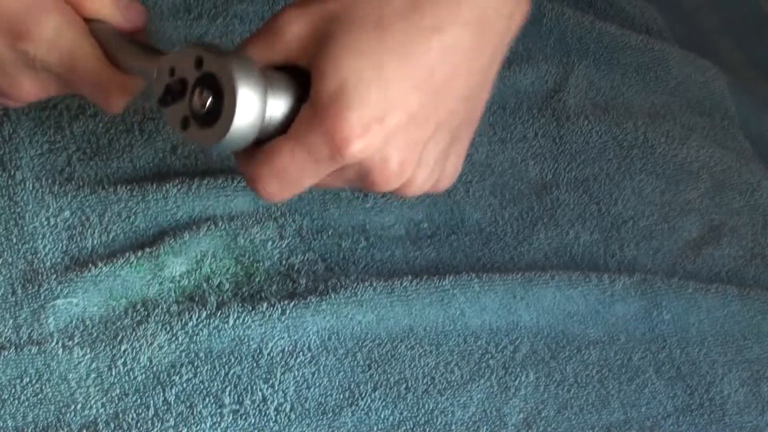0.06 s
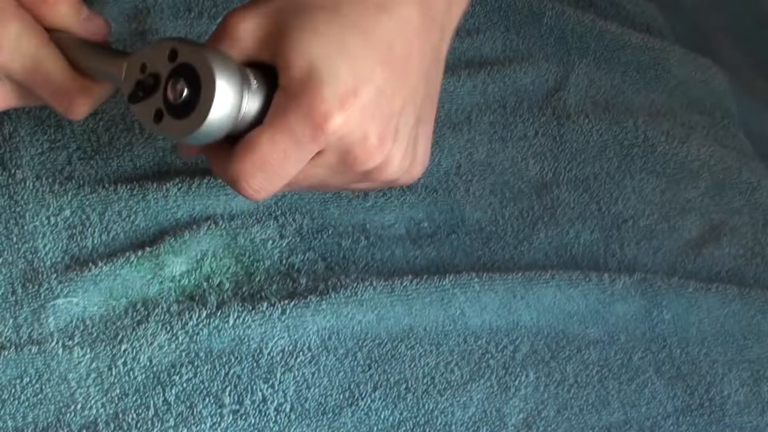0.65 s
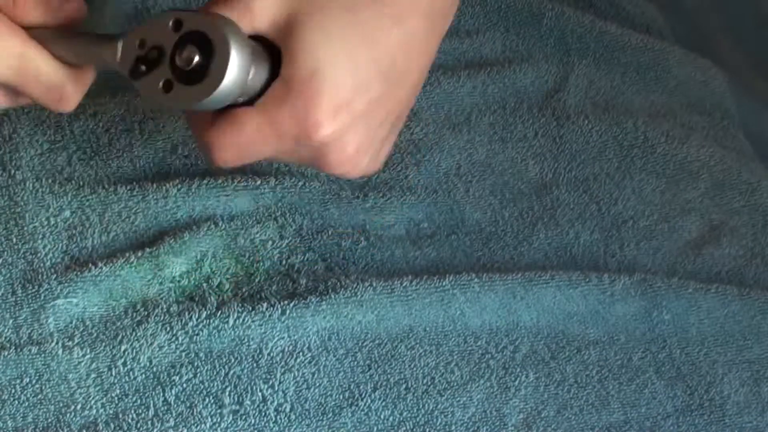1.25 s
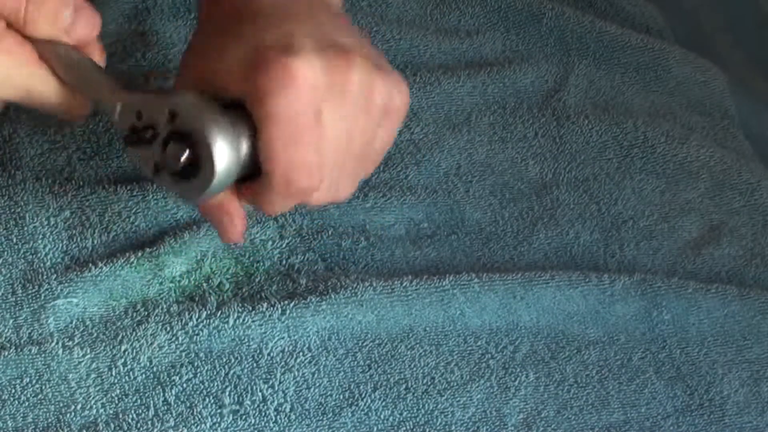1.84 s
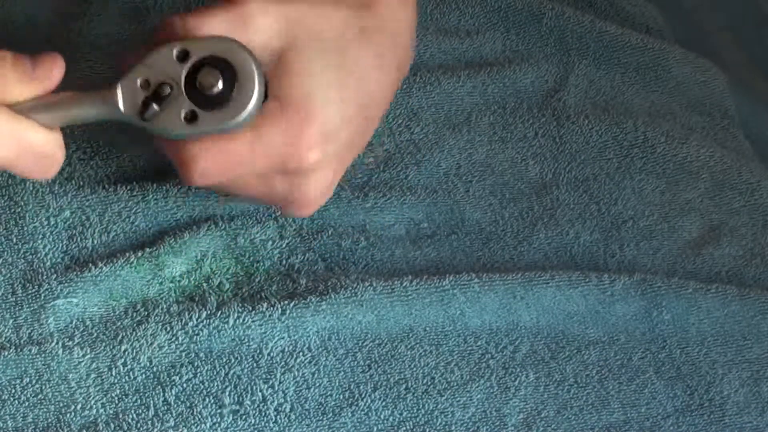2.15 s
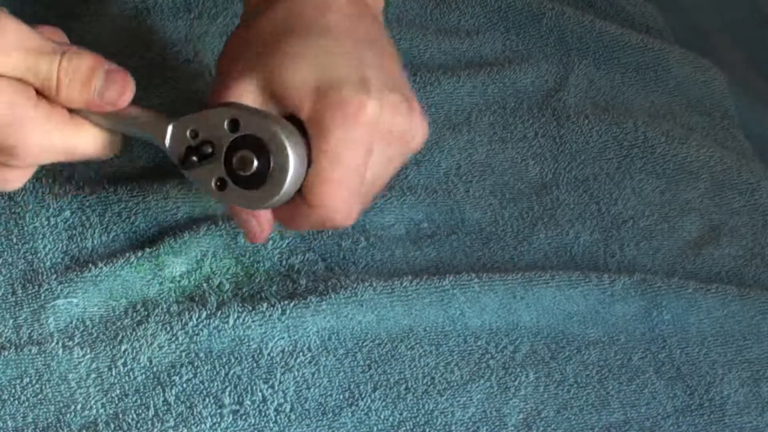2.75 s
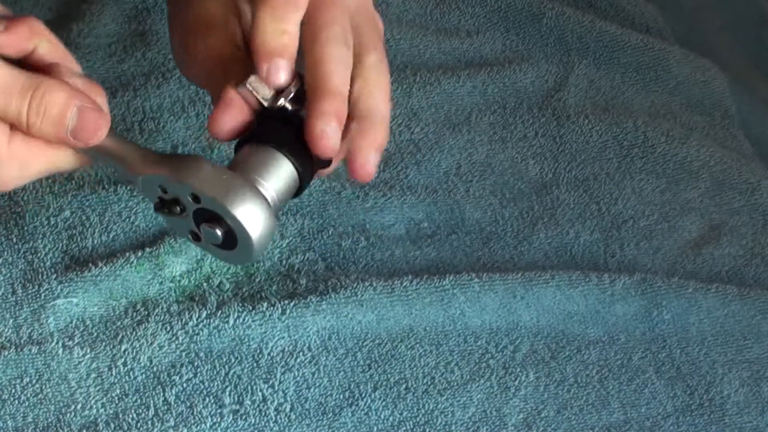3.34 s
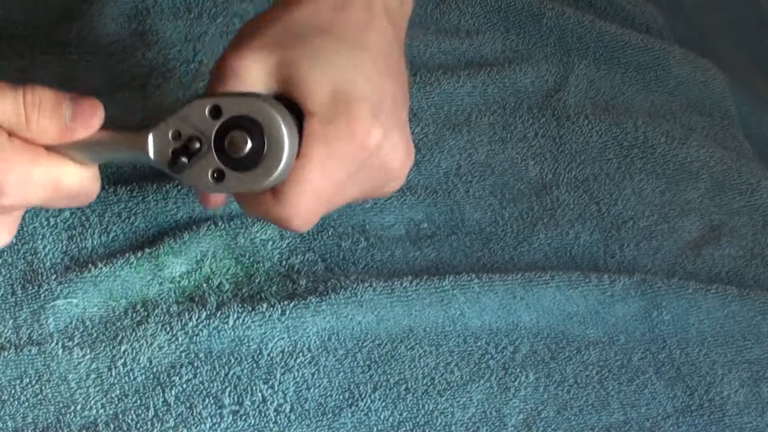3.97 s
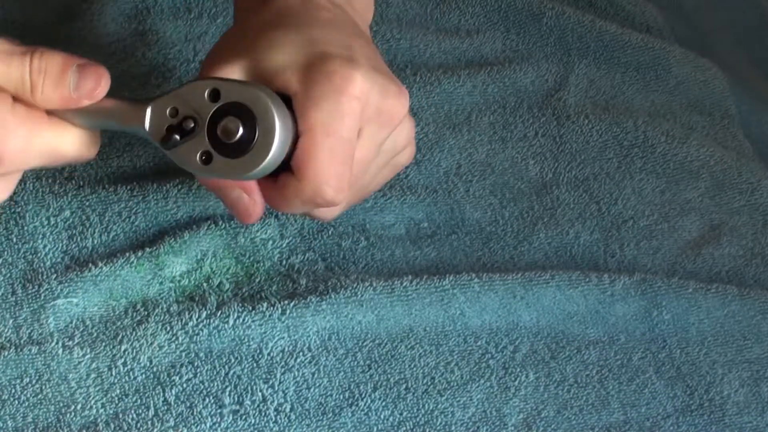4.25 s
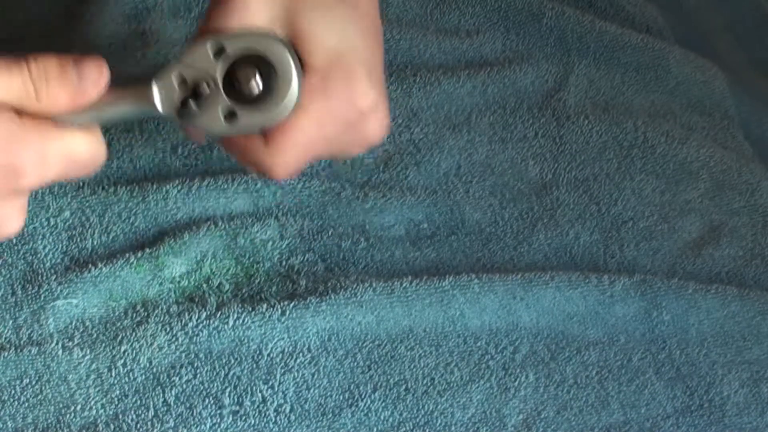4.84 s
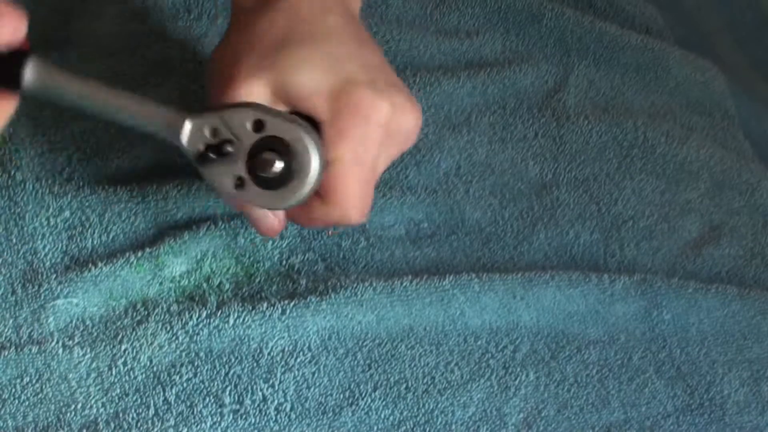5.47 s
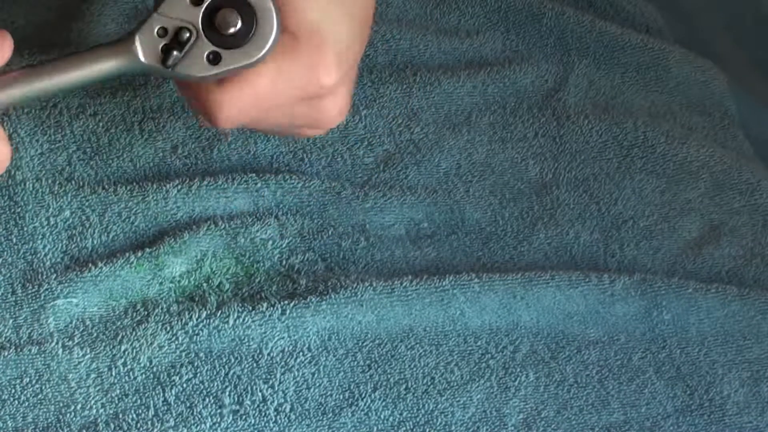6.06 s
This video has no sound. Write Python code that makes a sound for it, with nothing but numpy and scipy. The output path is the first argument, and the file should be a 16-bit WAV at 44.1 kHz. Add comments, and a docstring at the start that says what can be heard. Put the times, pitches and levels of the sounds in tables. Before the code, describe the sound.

Close to the microphone in a small room, a steel ratchet wrench clicks in five short, bright bursts. A dull knock on the bench and a fading metallic ring come first. After the third burst there is a lull with only light ticks, faint handling and one small clink of the socket, then the last two bursts follow. A soft hiss and a faint high whine lie underneath.

```python
"""A towel-covered workbench in a small room, where a socket ratchet is swung five times, close by.
On each back-swing the pawl snaps over five to eight teeth, and each impact excites the resonances of
the steel. Between swings the loose socket ticks and the hands bump and rub the tool. The tool knocks
once on the bench at the start; under everything lie a soft hiss and a thin electronic whine."""
import sys
import numpy as np
from scipy import signal
from scipy.fft import rfft, irfft, next_fast_len
from scipy.io import wavfile
from scipy.ndimage import uniform_filter1d

SR = 44100
rng = np.random.default_rng(int(sys.argv[2]) if len(sys.argv) > 2 else 0)


def put_to_file(sound):
    """Save the sound as 16-bit audio at rate SR, in the file named by the first command-line argument."""
    columns = np.atleast_2d(sound).T  # one column per channel
    safe = np.clip(columns, -1, 1)
    whole_steps = np.round(safe * 32767)
    wavfile.write(sys.argv[1], SR, whole_steps.astype(np.int16))


N = 273627
TIME = np.arange(N) / SR
CLICK_SIZE = 4096
BIN_HZ = np.fft.rfftfreq(CLICK_SIZE, 1 / SR)

# spectrum of the background noise: frequency_hz, relative_db
HISS_SPECTRUM = [(15, -58), (25, -16), (107, -5.5), (174, -4.5), (380, -4.5), (485, -5), (652, -4.5),
                 (1060, -6.5), (1500, -7), (1920, -8.5), (2440, -8.5), (2650, -10), (5950, -13),
                 (7380, -13.5), (15700, -17.5)]
# left-right likeness of that noise: frequency_hz, coherence
HISS_COHERENCE = [(50, 0.959), (150, 0.903), (500, 0.1194), (1500, 0.1338), (4000, 0.6746), (8000, 0.8914),
                  (12000, 0.9882)]
# electronic tones: pitch_hz, level_db
WHINE_TONES = [(2521, -65.5), (7499, -77.5), (8651, -79.5)]
# reverberation time: frequency_hz, t60_s
ROOM_DECAY = [(200, 0.0009), (1300, 0.3856), (3500, 0.4167), (5450, 0.3264), (7200, 0.3464), (9000, 0.316),
              (15000, 0.2322)]
# spectrum of the reverberation: frequency_hz, gain_db
ROOM_SPECTRUM = [(200, -4.5), (1000, 3), (3200, -3.5), (6000, -2), (9000, -5.5), (15000, -10.5)]
# left-right likeness of the room: frequency_hz, coherence
ROOM_COHERENCE = [(200, 1), (900, 0.6), (2200, 0.96), (4500, 0.84), (8000, 0.88), (13000, 1)]
# skin sliding as the grip shifts: start_s, level_db
HAND_RUBS = [(0.769, -59), (1.53, -60.5), (5.42, -62)]
# dull blows of hands and tool: start_s, level_db, pitch_hz, decay_s
HAND_BUMPS = [(.014, -39, 462.6, 0.01138), (.016, -42, 828.4, 0.01432), (.027, -47, 190.1, 0.01251),
              (1.635, -56, 270.4, 0.03518), (1.80, -58.5, 295.3, 0.01823), (2.50, -66.5, 100.1, 0.03216),
              (2.985, -56, 999.4, 0.008105), (3.278, -63, 659.4, 0.0612), (5.158, -42.5, 1355, 0.010924),
              (5.206, -55, 691.4, 0.02838)]
# the bench under the tool: pitch_hz, relative_db, t60_s
BENCH_MODES = [(246.67, -14.5, 0.2013), (336.14, -18, 0.3043), (442.4, -10.5, 0.3774),
               (484.33, -3.5, 0.1137), (767.82, -8.5, 0.1184), (935, -21.5, 0.1733), (1458.7, -7.5, 0.0757)]
# the handle nudged by the palm: pitch_hz, relative_db, t60_s
HANDLE_MODES = [(915.92, 2, 0.1089), (1031.9, -4.5, 0.1199), (1470, -7, 0.142)]
# the loose socket: pitch_hz, nominal_width_hz, relative_db
SOCKET_MODES = [(2360, 415.4, -2.5), (3400, 536, -0.5), (3868.8, 510.7, 1.5), (6013, 867, -1.5),
                (6795, 811, -2.5), (10010, 2540, -19)]
# broad spectrum of steel on steel: frequency_hz, relative_db
STEEL_SPECTRUM = [(100, -47), (300, -49), (600, -20.5), (1000, -20.5), (1500, -12), (2200, -11), (3000, -6),
                  (4600, -3), (6000, 0.5), (8200, -0.5), (10000, -3.5), (13000, -6), (15000, -9),
                  (15750, -17)]
# resonances of the wrench: pitch_hz, half_width_hz, lift_db
WRENCH_MODES = [(1509.7, 101.34, 3.5), (3055.6, 372.6, 2), (4295.5, 47.83, 3.5), (5462.9, 134.4, 9.5),
                (5955.8, 82.6, 2.5), (6940.2, 100, -1.5), (7214.7, 243.5, 3), (7789.2, 120, 2),
                (9640.3, 205.5, 4.5), (10738, 160.4, 6), (13010, 306.5, 5), (14700, 264.3, 5)]
# colour of a tick on bare steel: frequency_hz, relative_db
BARE_COLOUR = [(1500, 4.5), (3300, 0), (5600, 2.5), (11000, 1)]
# colour of a tick muffled by the hand: frequency_hz, relative_db
MUFFLED_COLOUR = [(700, 20), (1500, 24), (3300, 18.5), (5600, 10.5), (6800, 0.5), (11000, -11)]
# play taken up in the drive: start_s, level_db, extra_snap_db, dullness (0 bare, 1 muffled), pitch_hz
SLACK_TICKS = [(0.1873, -44, -0.5, 0.395, 7575), (0.1916, -41.5, 20, 0.0993, 6963),
               (0.404, -34, -4.5, 0.4955, 5910), (0.4115, -28.5, 19.5, 0.2516, 5845),
               (1.0201, -43, 10, 0.5245, 5870), (1.0449, -40, -5, 0.601, 1601),
               (1.0555, -40, 5, 0.325, 1741), (1.251, -29, 0, 0.2083, 5673),
               (1.483, -52.5, -1, 0.2604, 7617), (1.7852, -47.5, -1.5, 0.734, 4472),
               (1.7992, -35.5, 2, 0.416, 5134), (2.21, -49.5, -3, 1, 2268), (2.2257, -36, 0, 0.3196, 6815),
               (2.35, -45, 6.5, 0.962, 3400), (2.398, -54.5, -2, 0.799, 1259), (2.884, -52, 7, 0.652, 1500),
               (3.285, -54.5, 3.5, 1, 2757), (3.677, -54.5, 2, 0.895, 2486),
               (3.7976, -58.5, 16, 0.404, 4827), (3.8218, -57.5, 6, 1, 3193), (3.8803, -55, 0, 0.282, 9490),
               (4.5183, -51.5, -2, 0.577, 3640), (4.5243, -47, 1.5, 0.592, 2656),
               (4.5381, -49, 14.5, 0, 6367), (4.8042, -38.5, 16, 0.2123, 9226),
               (4.813, -39.5, -0.5, 0.5185, 5299), (5.159, -38.5, 24.5, 0.7205, 4272),
               (5.7538, -49.5, -9, 0.6667, 2556), (5.769, -50.5, 8.5, 0, 9930),
               (5.7841, -55, 0, 0.587, 3468), (5.826, -33.5, 9, 0.0345, 12970)]
# the pawl dropping off a tooth: start_s, level_db, extra_snap_db, head_ring_db, pitch_hz
PAWL_DROPS = [(0.4414, -17.5, 16, -0.5, 5594), (0.4588, -17.5, 13, 4.5, 8309), (0.4769, -19, 7, 4.5, 8322),
              (.4944, -16.5, 9.5, 3.5, 5104), (.514, -18, -1, 0.5, 5092), (.536, -18, 1.5, 0.5, 4243),
              (.5785, -18.5, -8, -3.5, 6204), (1.077, -17, 6.5, -1.5, 7332), (1.095, -18, 2, 4, 4467),
              (1.1134, -18.5, 6, -1, 7573), (1.1295, -19, -11.5, 0.5, 4282), (1.1481, -17, 12, -1, 6123),
              (1.1663, -18.5, 6, 3, 3470), (1.1858, -17.5, -3, -2.5, 5749), (1.2111, -18, 1.5, 3.5, 7645),
              (1.8388, -18, 11, 0, 6250), (1.8637, -18.5, 10, -2.5, 9723), (1.8904, -18, 7.5, 0, 10050),
              (1.9309, -18.5, -0.5, 0.5, 8033), (1.9713, -17, 7, -1.5, 4219), (2.0124, -18, -1, 1, 7484),
              (2.07, -17.5, -1, 5, 7440), (4.5615, -21.5, 2, -6, 4298), (4.5953, -20.5, -0.5, -0.5, 8851),
              (4.6358, -20.5, -13, -0.5, 7077), (4.6674, -19.5, 6, 3.5, 14700),
              (4.7015, -19, -2.5, 4, 6747), (5.8277, -21.5, -9.5, 4, 10610),
              (5.8685, -21, -7.5, -5.5, 6313), (5.9025, -18.5, 6.5, 1, 4353), (5.94, -19, 2, 5, 3336),
              (5.9938, -19, 3.5, 4, 9305)]
HEAD_HZ = 5574.3  # ring of the ratchet head


def amp(db):
    """Amplitude grows tenfold every 20 dB."""
    return 10 ** (np.asarray(db) / 20)


def unit(x):
    """Normalisation to an rms of 1."""
    return x / np.sqrt(np.mean(x ** 2) + 1e-20)


def curve(points, hz):
    """Interpolation of (frequency_hz, value) points on a log-frequency axis."""
    knots_hz, values = np.transpose(points)
    return np.interp(np.log(hz + 1), np.log(knots_hz + 1), values)


def add(mix, start_s, sound):
    """Superposition: a sound sums into the mix from start_s."""
    part = mix[round(start_s * SR):][:len(sound)]
    part += sound[:len(part)]


def resonance(hz, centre_hz, width_hz):
    """Lorentzian response of a damped resonator, with a peak of 1."""
    return 1 / (1 + (2 * (hz - centre_hz) / width_hz) ** 2)


def colour(x, gain_db):
    """Causality: a minimum-phase filter rings only after the blow."""
    log_gain = np.log(amp(np.concatenate([gain_db, gain_db[-2:0:-1]])))
    response = np.exp(np.conj(signal.hilbert(log_gain)))
    return irfft(rfft(x) * response[:len(gain_db)])


def whiten(blow, share):
    """Spectral whitening evens out a noise burst, since a blow itself has no pitch."""
    power = uniform_filter1d(abs(rfft(blow)) ** 2, size=41)
    return colour(blow, -share * 10 * np.log10(np.maximum(power / power.mean(), 1e-4)))


def stereo(a, b, coherence):
    """Partial coherence: two independent spectra mix as mid and side into left and right."""
    mid, side = np.sqrt((1 + coherence) / 2) * a, np.sqrt((1 - coherence) / 2) * b
    return np.array([mid + side, mid - side])


def background(hiss_db=-56, early_lift_db=3.5, settle_s=4.298):
    """Broadband noise (room rumble, microphone hiss) settles under a weakly frequency-modulated whine."""
    size = next_fast_len(N, True)
    hz = np.fft.rfftfreq(size, 1 / SR)
    a, b = rfft(rng.standard_normal((2, size)))
    spectrum = stereo(a, b, curve(HISS_COHERENCE, hz)) * amp(curve(HISS_SPECTRUM, hz))
    hiss = unit(irfft(spectrum, size)[:, :N])
    waver = 0.000633 * unit(uniform_filter1d(rng.standard_normal(N), size=3000))
    clock_s = np.cumsum(1 + waver) / SR
    whine = sum(amp(db) * np.sqrt(2) * np.sin(2 * np.pi * f * clock_s) for f, db in WHINE_TONES)
    return amp(hiss_db + early_lift_db * np.maximum(1 - TIME / settle_s, 0)) * hiss + whine


def room_response(build_s=0.005684, size=20480):
    """Dense reflections build up quickly, then absorption takes each band away at its own rate."""
    hz, t, noise = signal.stft(rng.standard_normal((2, size)), SR, nperseg=256)
    hz = hz[:, None]
    decay_per_s = np.log(1000) / curve(ROOM_DECAY, hz)
    bands = stereo(*noise, curve(ROOM_COHERENCE, hz))
    bands *= np.exp(-decay_per_s * t) * np.sqrt(2 * decay_per_s / SR) * amp(curve(ROOM_SPECTRUM, hz))
    onset = 1 - np.exp(-(np.arange(size) / SR / build_s) ** 2)
    return signal.istft(bands, SR, nperseg=256)[1][:, :size] * onset


def reverberation(x, patterns=3, switches_per_s=29):
    """Convolution with three steadily alternating room responses weakens fixed ringing pitches."""
    spectrum, size = 0, next_fast_len(N + SR, True)
    active = (TIME * switches_per_s).astype(int) % patterns
    for k in range(patterns):
        crossfade = np.sqrt(np.maximum(uniform_filter1d(1. * (active == k), size=400), 0))
        spectrum = spectrum + rfft(x * crossfade, size) * rfft(room_response(), size)
    return irfft(spectrum, size)[:, :N]


def near_echoes(x, gain_db=-13.5, decay_s=0.00133, size=1024):
    """Early reflections from hands and bench, opposite in polarity left and right, widen the sound."""
    t = np.arange(size) / SR
    taps = rng.standard_normal(size) * np.exp(-t / decay_s) * (t > .001)
    taps = signal.lfilter(*signal.butter(2, 7500, fs=SR), taps / np.linalg.norm(taps))
    return amp(gain_db) * signal.oaconvolve(x, taps)[:N] * np.array([[1], [-1]])


def steel_response():
    """Frequency response of the struck wrench in dB: resonances stand on a broad spectrum."""
    peaks_db = sum(db * resonance(BIN_HZ, hz, 2 * half_width) for hz, half_width, db in WRENCH_MODES)
    return curve(STEEL_SPECTRUM, BIN_HZ) + peaks_db


def dying_rattle(level_db=-26, decay_s=0.049843, size=16384):
    """Free decay: at the start, steel and room still ring from an earlier swing."""
    out, hz = np.zeros((2, N)), np.fft.rfftfreq(size, 1 / SR)
    tone_db = np.interp(hz, BIN_HZ, steel_response())
    tone_db += curve([(1500, 7.5), (3200, 2), (5600, 3), (8000, -1.5), (14000, -6)], hz)
    a, b = rfft(rng.standard_normal((2, size)))
    noise = unit(irfft(stereo(a, b, curve(ROOM_COHERENCE, hz)) * amp(tone_db)))
    out[:, :size] = amp(level_db) * noise * np.exp(-np.arange(size) / SR / decay_s)
    return out


def puff(level_db, pitch_hz, rise_s, decay_s, size=16384):
    """Heavy damping gives a broad resonance, heard as a puff of noise."""
    t, hz = np.arange(size) / SR, np.fft.rfftfreq(size, 1 / SR)
    envelope = (1 - np.exp(-t / rise_s)) * np.exp(-t / decay_s)
    response = resonance(hz, pitch_hz, 60 + .5 * pitch_hz) * np.minimum(hz / pitch_hz, 1)
    noise = irfft(rfft(rng.standard_normal(size)) * response)
    return amp(level_db) * unit(noise) * envelope / envelope.max()


def rubs():
    """Sliding friction of skin on steel makes a faint hiss."""
    out = np.zeros(N)
    for start_s, level_db in HAND_RUBS:
        add(out, start_s, puff(level_db, pitch_hz=6555, rise_s=0.05365, decay_s=0.05815))
    return out


def bumps():
    """Soft, damped impacts: the longer ones also start more gently."""
    out = np.zeros(N)
    for start_s, level_db, pitch_hz, decay_s in HAND_BUMPS:
        add(out, start_s, puff(level_db, pitch_hz, 0.1476 * decay_s, decay_s))
    return out


def knock(modes, start_s, gain_db, rise_s=0.000603):
    """Modal vibration: a struck body sounds as a sum of exponentially decaying sinusoids."""
    t, out = np.arange(SR // 2) / SR, np.zeros(N)
    ring = sum(amp(db - 60 * t / t60) * np.sin(2 * np.pi * (hz * t + rng.random()))
               for hz, db, t60 in modes)
    add(out, start_s, amp(gain_db) * ring * (1 - np.exp(-t / rise_s)))
    return out


def socket(start_s=3.8854, level_db=-37.5, decay_s=0.003324):
    """Impulse excitation: the socket drops into its seat and its resonances give one clink."""
    out, t = np.zeros(N), np.arange(CLICK_SIZE) / SR
    power = sum(amp(db) ** 2 * resonance(BIN_HZ, hz, 1.471 * width) ** 2
                for hz, width, db in SOCKET_MODES)
    blow = whiten(rng.standard_normal(CLICK_SIZE) * np.exp(-t / decay_s), share=0.7996)
    clink = colour(blow, 10 * np.log10(power + 1e-5))
    add(out, start_s, amp(level_db) * clink / np.std(clink[:CLICK_SIZE // 8]))
    return out


def click(level_db, tone_db, grain, extra_snap_db, snap_s, chatter_s, linger_db, linger_s, alike, flat):
    """Source and filter: a sharp snap and some milliseconds of chatter ring the wrench."""
    t = np.arange(CLICK_SIZE) / SR
    snap = amp(extra_snap_db - 5) * np.exp(-(t / snap_s) ** 2)
    chatter = np.exp(-(t / chatter_s) ** 2) + amp(linger_db) * np.exp(-t / linger_s)
    # successive blows strike nearly the same spot, so they share a grain of noise
    noise = np.sqrt(alike) * grain + np.sqrt(1 - alike) * rng.standard_normal(CLICK_SIZE)
    force = noise * np.hypot(snap, chatter) * (1 - np.exp(-t / .0001))
    sound = colour(whiten(force, flat), tone_db)
    attack = sound[:round(.012 * SR)]
    return amp(level_db) * sound / np.sqrt(np.mean(attack ** 2))


def slack(contact_lift_db=6, head_damping_db=-12):
    """Backlash: play in the drive closes with light ticks; the hand muffles some and damps the head."""
    out, steel_db, grain = np.zeros(N), steel_response(), rng.standard_normal(CLICK_SIZE)
    for start_s, level_db, extra_snap_db, dullness, pitch_hz in SLACK_TICKS:
        tone_db = steel_db + (1 - dullness) * curve(BARE_COLOUR, BIN_HZ)
        tone_db += dullness * curve(MUFFLED_COLOUR, BIN_HZ)
        tone_db += dullness * head_damping_db * resonance(BIN_HZ, HEAD_HZ, width_hz=800)
        tone_db += contact_lift_db * resonance(BIN_HZ, pitch_hz, width_hz=600)
        tick = click(level_db, tone_db, grain, extra_snap_db, snap_s=0.000979, chatter_s=0.005343,
                     linger_db=-8, linger_s=0.01474, alike=0.1042, flat=0.5855)
        add(out, start_s, tick)
    return out


def pawl(contact_lift_db=8.5, swing_gap_s=.2):
    """Impact excitation: the pawl drops off each tooth, and each contact picks out its own pitch."""
    out, previous_s = np.zeros(N), -1
    # the hard pawl is a little brighter
    steel_db = steel_response() + curve([(2000, 0), (3200, 0.816), (5800, 1.446), (13000, 1.328)], BIN_HZ)
    for start_s, level_db, extra_snap_db, head_ring_db, pitch_hz in PAWL_DROPS:
        if start_s - previous_s > swing_gap_s:  # each swing holds the wrench differently
            grain = rng.standard_normal(CLICK_SIZE)
        # a tooth that snaps cleanly has less middle and treble
        middle_db, treble_db = 1.4192 - 0.2557 * extra_snap_db, 0.7287 - 0.1389 * extra_snap_db
        tone_db = steel_db + curve([(1500, 0), (3300, middle_db), (6800, 0), (11000, treble_db)], BIN_HZ)
        tone_db += head_ring_db * resonance(BIN_HZ, HEAD_HZ, width_hz=560)
        tone_db += contact_lift_db * resonance(BIN_HZ, pitch_hz, width_hz=303.1)
        tooth = click(level_db, tone_db, grain, extra_snap_db, snap_s=0.002052, chatter_s=0.011987,
                      linger_db=-7.5, linger_s=0.01117, alike=0.2625, flat=0.2392)
        add(out, start_s, tooth)
        previous_s = start_s
    return out


def scene():
    """Superposition of the tool's direct sound, its reflections and the background."""
    tool = pawl() + slack() + socket() + bumps() + rubs()
    tool += knock(BENCH_MODES, start_s=.016, gain_db=-32)
    tool += knock(HANDLE_MODES, start_s=5.46, gain_db=-53)
    heard = tool + dying_rattle() + near_echoes(tool) + reverberation(tool)
    return heard * amp([[-.2], [.2]]) + background()  # the tool is slightly to the right


def record(dry, cutoff_hz=15900):
    """Band limiting: a linear-phase low-pass filter removes the highest treble."""
    low_pass = signal.firwin(401, cutoff_hz, window=("kaiser", 8), fs=SR)
    return signal.oaconvolve(dry, low_pass[None], "same")


dry = scene()
out = record(dry)
put_to_file(out)
```